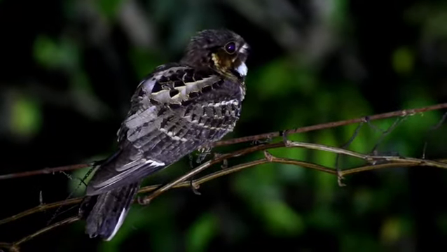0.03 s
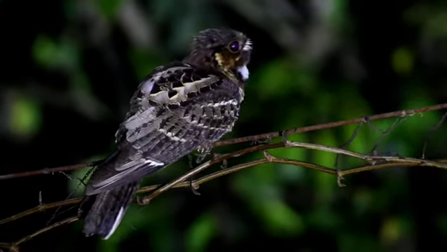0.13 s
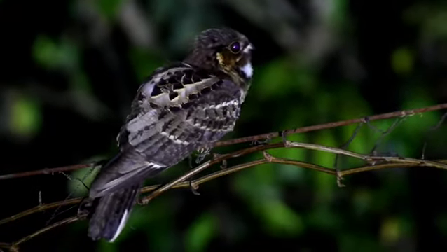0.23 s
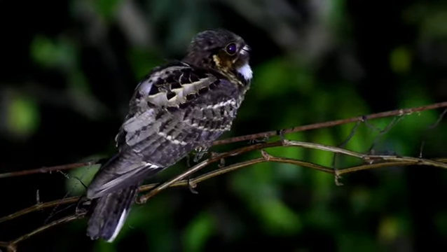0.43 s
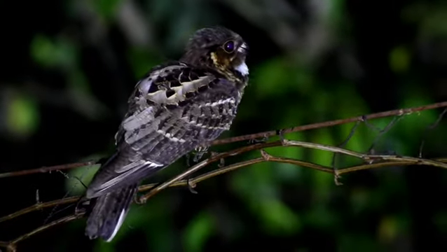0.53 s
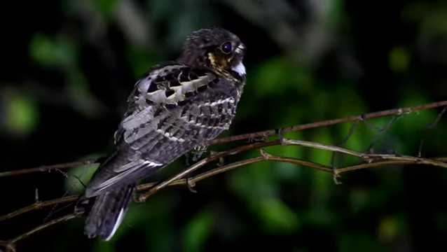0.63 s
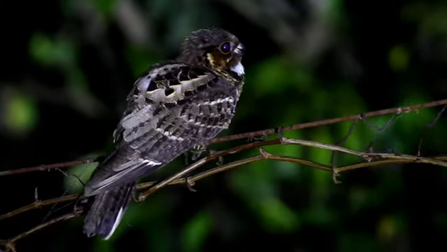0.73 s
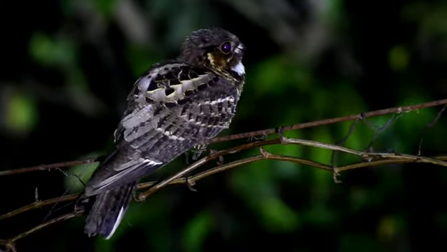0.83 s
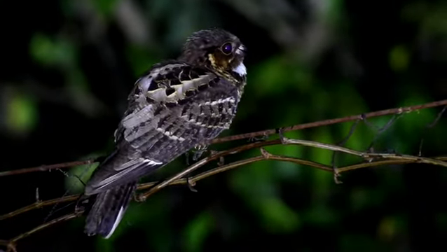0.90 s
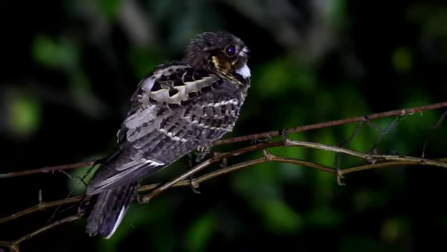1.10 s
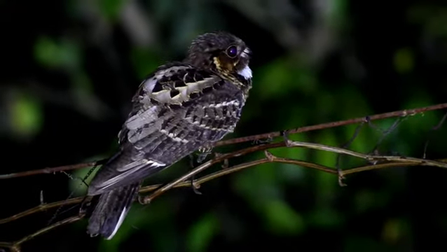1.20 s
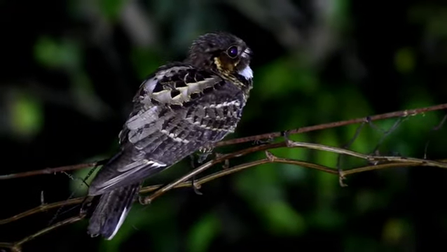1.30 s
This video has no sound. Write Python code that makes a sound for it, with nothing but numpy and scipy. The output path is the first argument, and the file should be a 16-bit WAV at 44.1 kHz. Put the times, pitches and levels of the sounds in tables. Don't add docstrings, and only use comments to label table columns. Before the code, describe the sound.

Continuous high insect buzz and soft night air, a faint leaf tick, then one quick, pure, wobbling bird call in the center, fading into forest reverberation; outdoor stereo microphone, insects spread left and right.

```python
import sys
import numpy as np
from scipy import signal
from scipy.io import wavfile

SR = 44100
rng = np.random.default_rng(int(sys.argv[2]) if len(sys.argv) > 2 else 0)


def inscribe(sig):
    pcm = np.round(np.clip(np.atleast_2d(sig).T, -1, 1) * 32767)
    wavfile.write(sys.argv[1], SR, pcm.astype(np.int16))


def how_loud(loudness_db):
    steps = np.asarray(loudness_db, float) / 20
    return 10 ** steps


N = 59535

# t/s, length/s, level/dB, start f/Hz, left over right/dB
INSECT_SWEEPS = [(-.03, 0.13, -46, 6106, 1), (.06, 0.15, -49.5, 5700, 3), (.21, 0.13, -45.5, 6030, 3.5),
                 (.32, .14, -48.5, 6160, -0.5), (0.437, 0.25, -62, 5800, 3), (0.583, 0.1, -49.5, 5900, 6.5),
                 (0.675, 0.2, -48.5, 6125, 8), (0.829, .13, -51, 6070, 3), (0.955, 0.16, -50.5, 6330, -1),
                 (1.17, 0.16, -45, 6020, 2), (1.212, 0.14, -54.5, 6020, -6), (1.284, 0.1, -51.5, 6220, 0)]
# f/Hz, density/dB per Hz
AIR_SPECTRUM = [(35, -14), (55, -4.5), (320, 0), (700, -1.5), (1700, -9.5), (4500, -13.5), (7000, -20.5),
                (10000, -15.5)]
# f/Hz, correlation/1
AIR_LIKENESS = [(40, 0.64), (250, .4), (1000, 0.12), (2500, 0.026)]
# t/s, level/dB
DRONE_SWELL = [
    (0, -74),
    (.62, -76),
    (.72, -61.5),
    (.85, -75.5),
    (1.0, -68),
    (1.25, -66),
    (1.35, -61),
]
# t/s, pitch f/Hz, haste of next swing/1, second partial level/dB
WHISTLE_TURNS = [
    (.2355, 1512, .9, -64),
    (.2735, 1512, .8, -68),
    (.312, 698, .95, -86),
    (.363, 1260, 1.05, -64),
    (.414, 648, .95, -86),
    (.460, 1168, 1.05, -66),
    (.503, 665, .95, -86),
    (.524, 830, .95, -86),
]
# t/s, level/dB
VOICE_EFFORT = [
    (.2365, -28),
    (.247, -27.5),
    (.279, -18.5),
    (.296, -33),
    (.365, -53),
    (.412, -38),
    (.456, -49.5),
    (.496, -44),
    (.526, -47),
]
# multiple of pitch/1, level re third/dB
VOICE_PARTIALS = [(3, 0), (5, -12), (7, -13), (8, -14)]
# delay t/s, left level/dB, right level/dB
NEAR_ECHOES = [
    (.0045, -6, -16),
    (.011, -15.5, -46),
    (.037, -15.5, -20.5),
]

CHORUS_HZ, CHORUS_WIDTH_HZ, CHORUS_DB, CHORUS_PATCHY_DB = 5586, 385, -55, 4
CHORUS_LOW_HZ, CHORUS_TOP_HZ = 4850, 6200
FAR_SINGER_DB, FAR_SINGER_PATCHY_DB, FAR_SPREAD_HZ, FAR_SINGER_WIDTH_HZ = -61.5, 3.5, 500, 70
FALL_HZ_PER_S, RASP_WIDTH_HZ, RASP_PER_S, RASP_DEPTH = 5300, 175, 120, 0.28
CRICKET_HZ, CRICKET_WIDTH_HZ, CRICKET_DB, CRICKET_PAN_DB = 3510, 230, -61.5, 4.5
TRILL_PER_S, TRILL_START_S, TRILL_DEPTH, TRILL_SHARP = 35, 0.0089, .3, 4.0
HIGH_SINGER_HZ, HIGH_SINGER_WIDTH_HZ, HIGH_SINGER_DB = 6950, 100, -78.5
AIR_DB, AIR_PATCHY_DB = -57.5, 0.5
DRONE_HZ, DRONE_WIDTH_HZ = 334.3, 96
TICK_S, TICK_LOW_HZ, TICK_HIGH_HZ, TICK_T60_S, TICK_DB = .0985, 1200, 9800, .2, -51
SCOOP_HZ, SCOOP_S, CATCH_HZ, CATCH_S = 210, .012, 300, .001
ATTACK_S, RELEASE_S = .0018, .004
THIRD_DB, THIRD_DB_PER_KHZ, OVERTONE_FLICKER_DB = -38.5, 47.5, 1.5
SHIMMER_DB, BIRD_PAN_DB = 0.77, -0.4
FOREST_DB, FOREST_T60_S, FOREST_ONSET_S, FOREST_ALIKE, FOREST_LUMPY_DB = -11.5, 0.49, 0.0097, 0.24, 5
FAR_TREES_DB, FAR_TREES_T60_S = -12, 1.07
CUTOFF_HZ = 15750


def rms_one(x):
    return x / np.sqrt(np.mean(np.abs(x) ** 2) + 1e-20)


def at_hz(points, hz):
    table_hz, value = np.transpose(points)
    return np.interp(np.log(hz), np.log(table_hz), value)


def wander(rate_hz, channels=1):
    pole = np.exp(-2 * np.pi * rate_hz / SR)
    run_in = SR if rate_hz < 46 else SR // 10
    white = rng.standard_normal((channels, N + run_in))
    return rms_one(signal.lfilter([1], [1, -2 * pole, pole * pole], white)[:, run_in:])


def narrow_noise(hz, width_hz):
    cos_part, sin_part = wander(width_hz, channels=4).reshape(2, 2, N)
    phase = 2 * np.pi * np.cumsum(hz + np.zeros(N)) / SR
    return cos_part * np.cos(phase) + sin_part * np.sin(phase)


def pan(db):
    return how_loud(np.array([[db / 2], [-db / 2]]))


def mid_side(mid, side, alike):
    return np.sqrt(1 + alike) * mid + np.sqrt(1 - alike) * side * np.array([[1], [-1]])


def chorus():
    t = np.arange(N) / SR
    patches = how_loud(CHORUS_DB + CHORUS_PATCHY_DB * wander(5.9, channels=2))
    out = patches * narrow_noise(CHORUS_HZ, CHORUS_WIDTH_HZ)
    for part in np.linspace(-1, 1, 5):
        level = how_loud(FAR_SINGER_DB + FAR_SINGER_PATCHY_DB * wander(9.9))
        out = out + level * narrow_noise(CHORUS_HZ + part * FAR_SPREAD_HZ, FAR_SINGER_WIDTH_HZ)
    for start_s, length_s, db, start_hz, pan_db in INSECT_SWEEPS:
        swell = np.sin(np.pi * np.clip((t - start_s) / length_s, 0, 1))
        rasp = 1 + RASP_DEPTH * np.sin(2 * np.pi * RASP_PER_S * rng.uniform(1.0, 1.3) * t)
        hz = start_hz - FALL_HZ_PER_S * np.clip(t - start_s, 0, length_s)
        out = out + how_loud(db) * pan(pan_db) * swell * rasp * narrow_noise(hz, RASP_WIDTH_HZ)
    out = signal.sosfilt(signal.butter(4, CHORUS_LOW_HZ, "high", fs=SR, output="sos"), out)
    return signal.sosfilt(signal.butter(12, CHORUS_TOP_HZ, fs=SR, output="sos"), out)


def cricket():
    t = np.arange(N) / SR
    beat = .5 + .5 * np.cos(2 * np.pi * TRILL_PER_S * (t - TRILL_START_S))
    pulses = 1 - TRILL_DEPTH + TRILL_DEPTH * 1.35 * beat ** TRILL_SHARP
    return how_loud(CRICKET_DB) * pan(CRICKET_PAN_DB) * pulses * narrow_noise(CRICKET_HZ, CRICKET_WIDTH_HZ)


def high_singer():
    return how_loud(HIGH_SINGER_DB + 3.0 * wander(2.7)) * narrow_noise(HIGH_SINGER_HZ, HIGH_SINGER_WIDTH_HZ)


def night_air():
    out = 0
    edges_hz = 25 * 2 ** np.arange(0, 9.6, .5)
    white = rng.standard_normal((2, 2, N + SR // 4))
    for k, (low_hz, high_hz) in enumerate(zip(edges_hz, edges_hz[1:])):
        band = signal.butter(2, [low_hz, high_hz], "band", fs=SR, output="sos")
        mid, side = signal.sosfilt(band, white[k % 2])[:, -N:]
        hz = np.sqrt(low_hz * high_hz)
        gain = how_loud(at_hz(AIR_SPECTRUM, hz) + AIR_PATCHY_DB * wander(7.7)[0])
        out = out + gain * mid_side(mid, side, at_hz(AIR_LIKENESS, hz))
    return how_loud(AIR_DB) * rms_one(out)


def far_drone():
    level = how_loud(np.interp(np.arange(N) / SR, *np.transpose(DRONE_SWELL)))
    return level * narrow_noise(DRONE_HZ, DRONE_WIDTH_HZ)[0]


def leaf_tick():
    t = np.arange(N) / SR - TICK_S
    decay = (t > 0) * how_loud(TICK_DB - 60 * np.maximum(t, 0) / TICK_T60_S)
    band = signal.butter(4, [TICK_LOW_HZ, TICK_HIGH_HZ], "band", fs=SR, output="sos")
    return signal.sosfilt(band, rng.standard_normal((2, N)) * decay)


def nightjar():
    t = np.arange(N) / SR
    turn_s, turn_hz, haste, turn_second_db = np.transpose(WHISTLE_TURNS)
    index = np.arange(len(turn_s))
    place = np.interp(t, turn_s, index)
    swing = (place % 1) ** haste[place.astype(int)]
    eased = np.floor(place) + .5 - .5 * np.cos(np.pi * swing)
    pitch_hz = np.interp(eased, index, turn_hz)
    second_db = np.interp(eased, index, turn_second_db)
    age = np.maximum(t - turn_s[0], 0)
    below_hz = SCOOP_HZ * np.exp(-age / SCOOP_S) + CATCH_HZ * np.exp(-age / CATCH_S)
    phase = 2 * np.pi * np.cumsum(pitch_hz - below_hz) / SR

    release = np.exp(-np.maximum(t - VOICE_EFFORT[-1][0], 0) / RELEASE_S)
    gate = np.clip(age / ATTACK_S, 0, 1) * release
    level = how_loud(np.interp(t, *np.transpose(VOICE_EFFORT)) + SHIMMER_DB * wander(37.5)[0])
    third_db = THIRD_DB + THIRD_DB_PER_KHZ * (pitch_hz - turn_hz[0]) / 1000
    third = how_loud(third_db + OVERTONE_FLICKER_DB * wander(30.0)[0])
    upper = third * sum(how_loud(db) * np.sin(k * phase) for k, db in VOICE_PARTIALS)
    second = how_loud(second_db + OVERTONE_FLICKER_DB * wander(45.0)[0]) * np.sin(2 * phase)
    return np.sqrt(2) * gate * (level * (np.sin(phase) + upper) + second)


def forest(x):
    t = np.arange(N) / SR
    fade = how_loud(-60 * t / FOREST_T60_S) + how_loud(FAR_TREES_DB - 60 * t / FAR_TREES_T60_S)
    onset = 1 - np.exp(-t / FOREST_ONSET_S)
    lumps = how_loud(FOREST_LUMPY_DB * wander(30.0))
    mid, side = rng.standard_normal((2, N)) * onset * lumps * fade
    tail = rms_one(mid_side(mid, side, FOREST_ALIKE)) / np.sqrt(N)
    out = how_loud(FOREST_DB) * signal.fftconvolve(tail, x[None], axes=1)[:, :N]
    for delay_s, left_db, right_db in NEAR_ECHOES:
        out = out + how_loud(np.array([[left_db], [right_db]])) * np.interp(t - delay_s, t, x)
    return out


def scene():
    night = chorus() + cricket() + high_singer() + night_air() + far_drone()
    bird = nightjar()
    return night + leaf_tick() + bird * pan(BIRD_PAN_DB) + forest(bird)


def top_cut(x):
    return signal.sosfilt(signal.butter(12, 16360, fs=SR, output="sos"), x)


def record(dry):
    low_pass = signal.ellip(14, .3, 70, CUTOFF_HZ, fs=SR, output="sos")
    return top_cut(signal.sosfilt(low_pass, dry))


dry = scene()
out = record(dry)
inscribe(out)
```